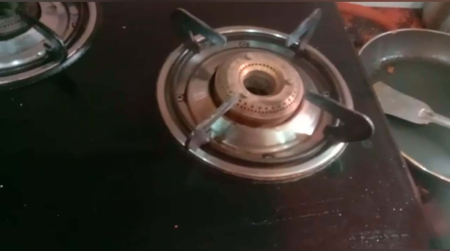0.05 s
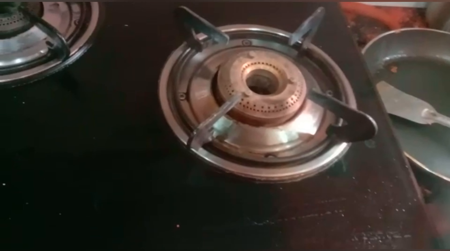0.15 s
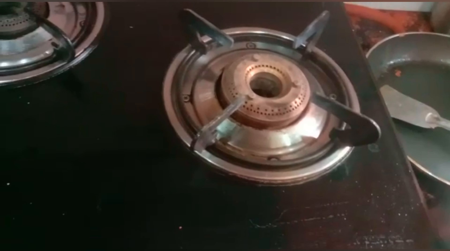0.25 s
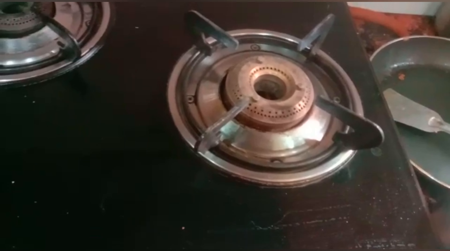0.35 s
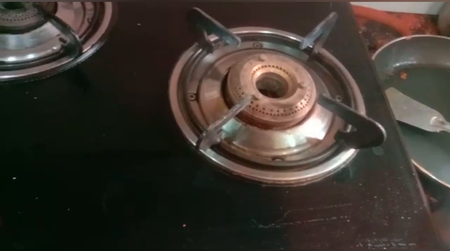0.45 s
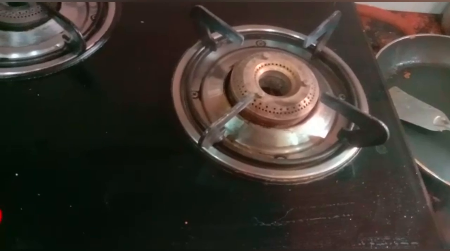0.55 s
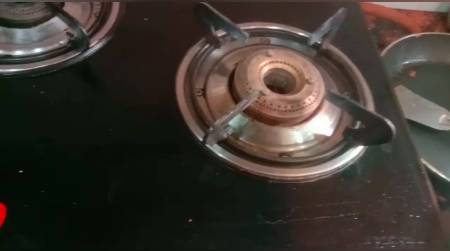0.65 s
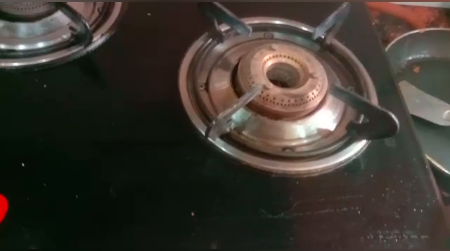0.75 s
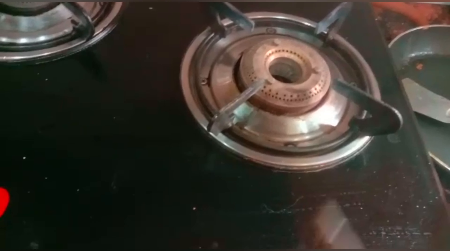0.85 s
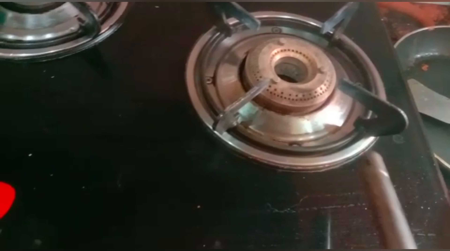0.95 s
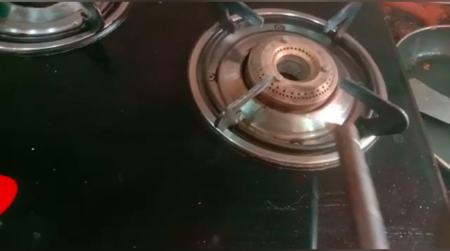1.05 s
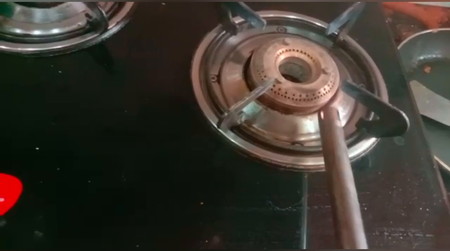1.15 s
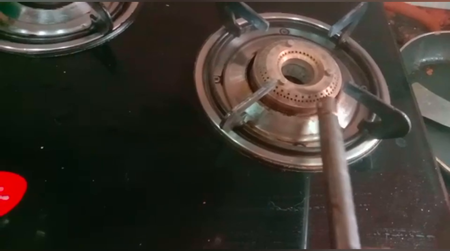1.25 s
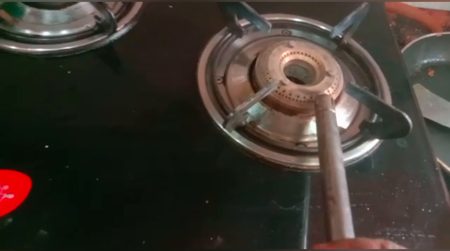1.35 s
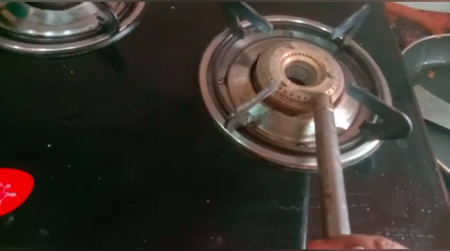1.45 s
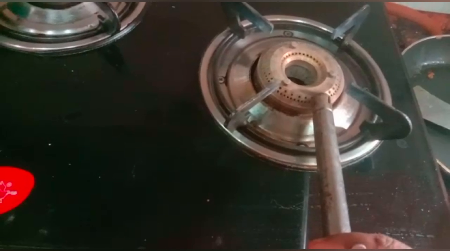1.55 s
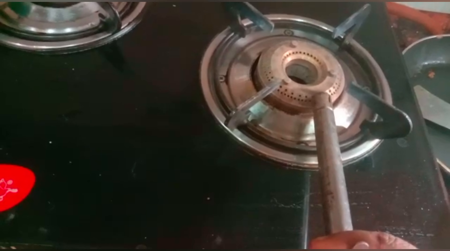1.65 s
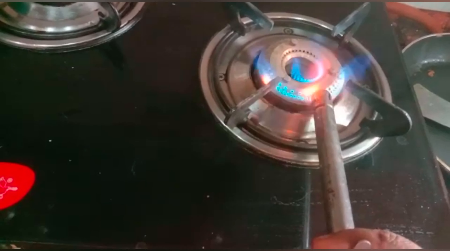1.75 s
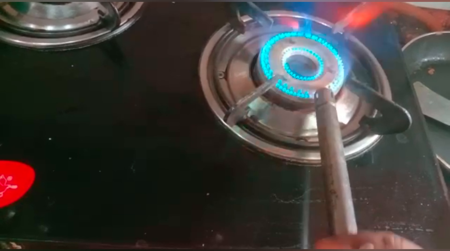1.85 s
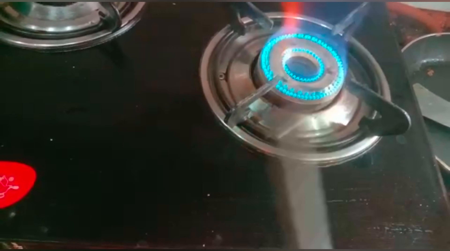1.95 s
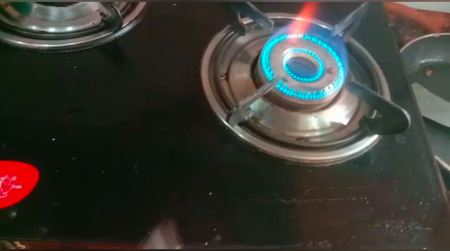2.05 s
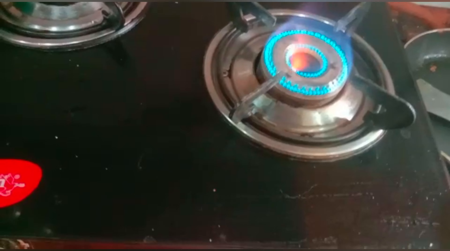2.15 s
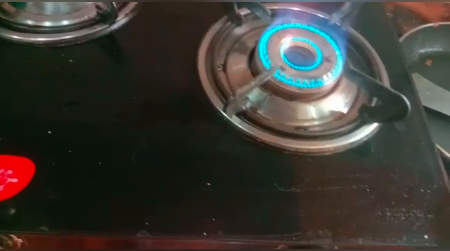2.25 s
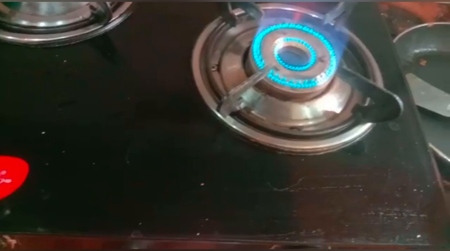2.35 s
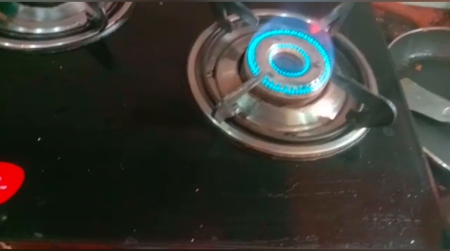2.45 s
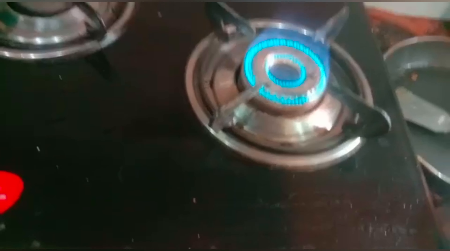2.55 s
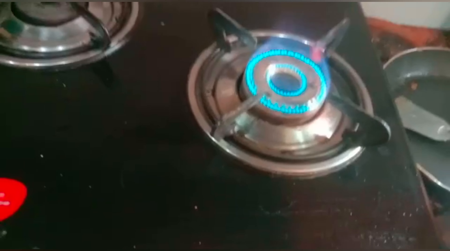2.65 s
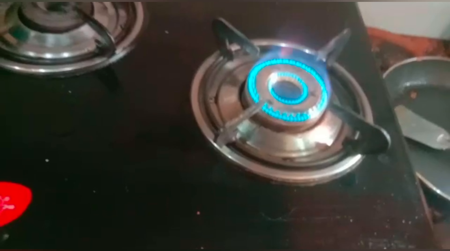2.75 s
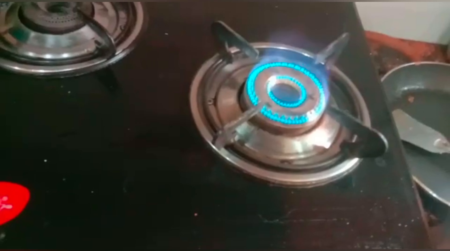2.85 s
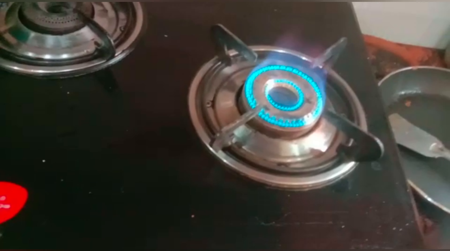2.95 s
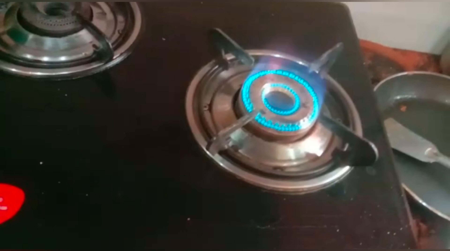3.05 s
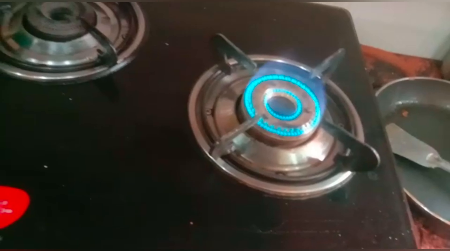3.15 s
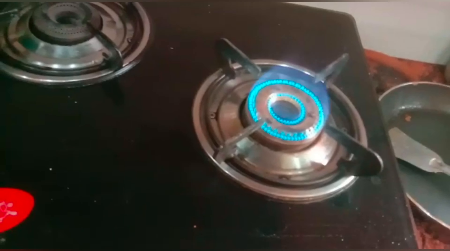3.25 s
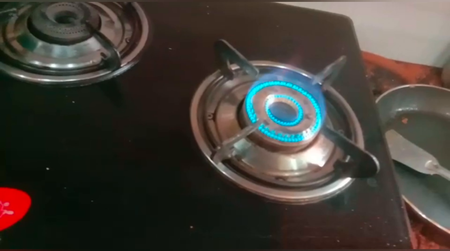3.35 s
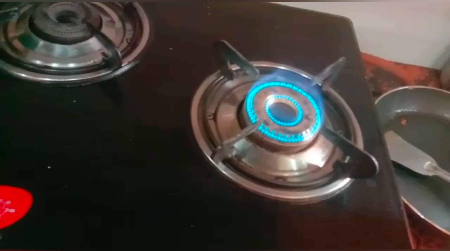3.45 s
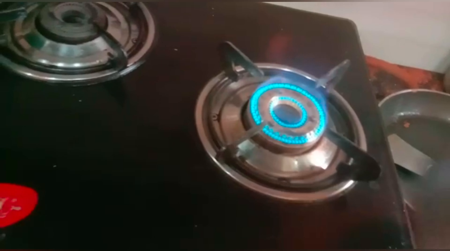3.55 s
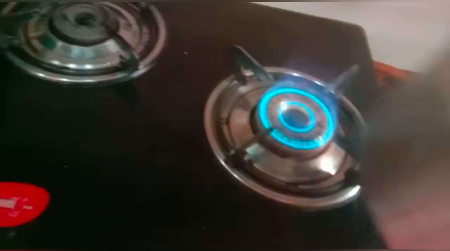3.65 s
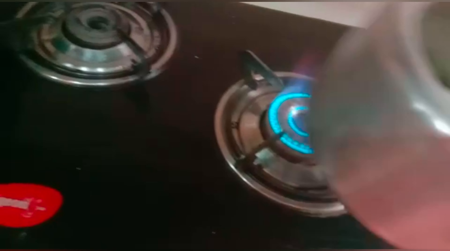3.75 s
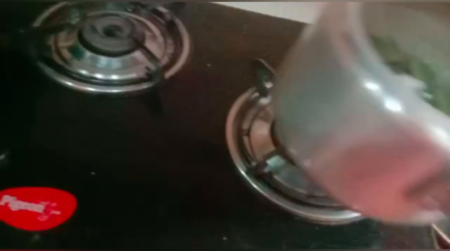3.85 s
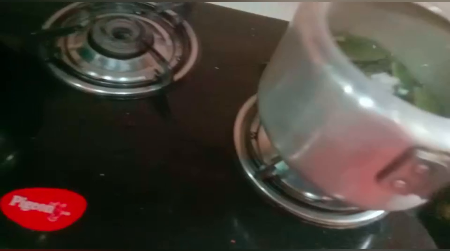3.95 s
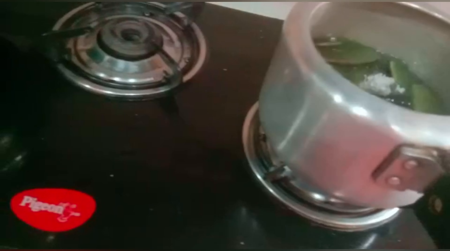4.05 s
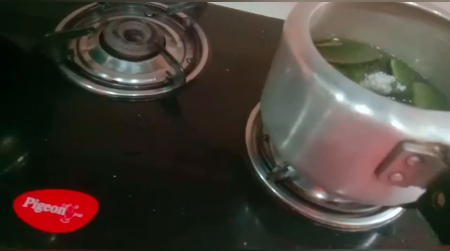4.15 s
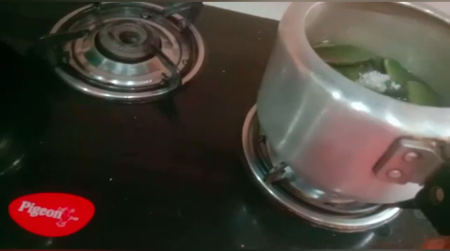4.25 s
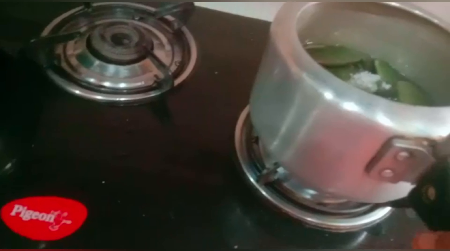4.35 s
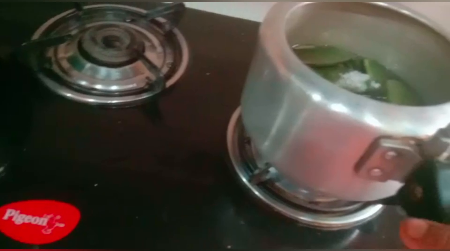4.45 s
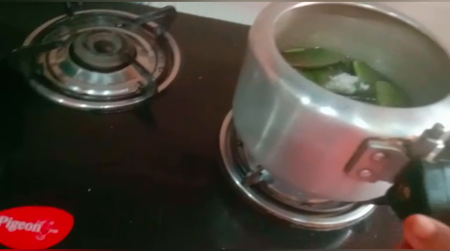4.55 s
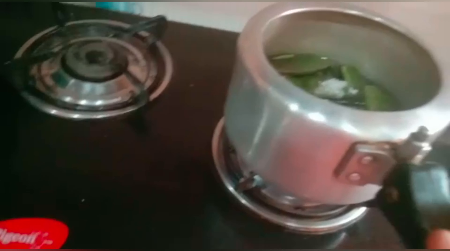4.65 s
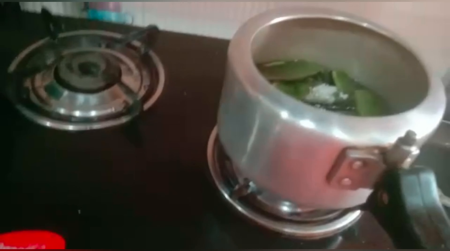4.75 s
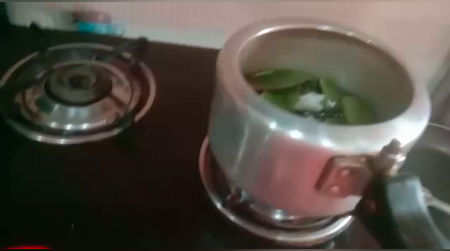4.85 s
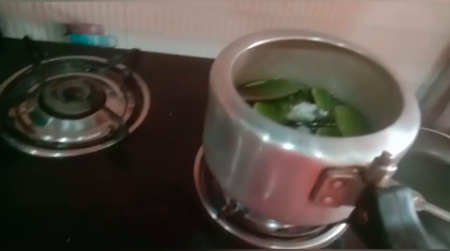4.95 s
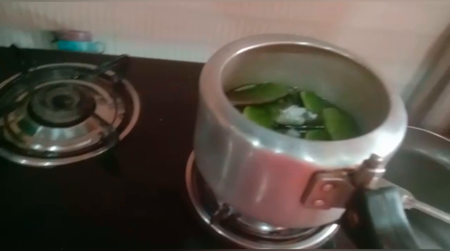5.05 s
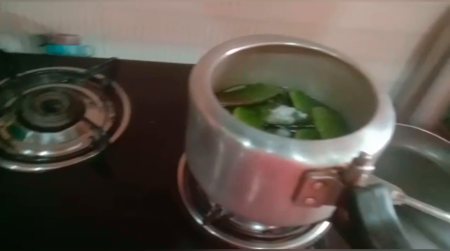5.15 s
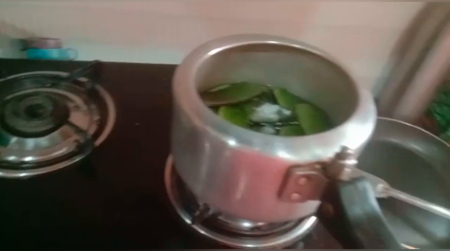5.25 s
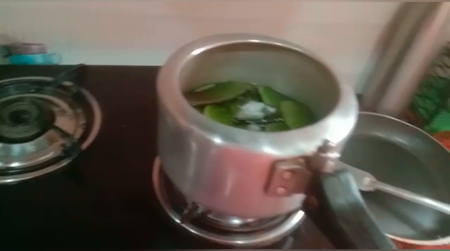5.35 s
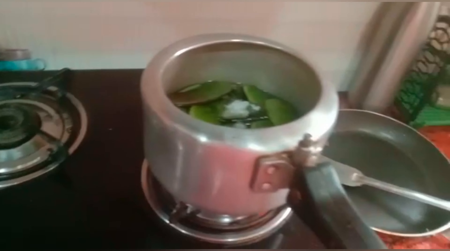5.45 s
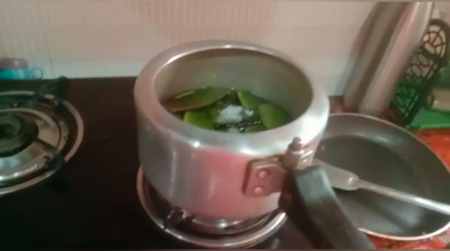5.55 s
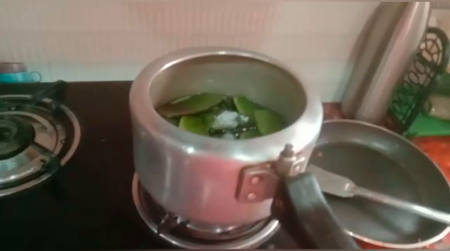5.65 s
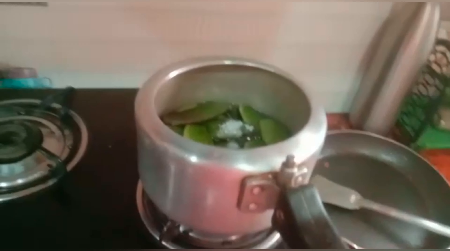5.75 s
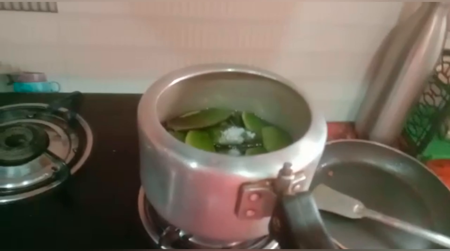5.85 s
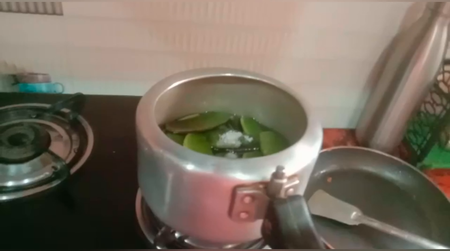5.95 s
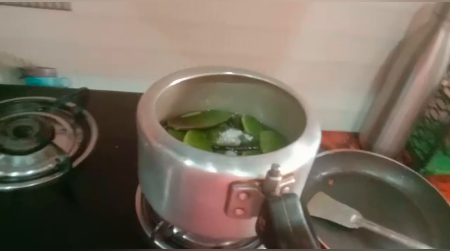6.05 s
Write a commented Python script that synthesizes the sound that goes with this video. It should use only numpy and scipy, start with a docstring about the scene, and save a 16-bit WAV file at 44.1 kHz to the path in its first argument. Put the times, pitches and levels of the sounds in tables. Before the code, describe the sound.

Sharp clicks and a soft whump of gas lighting in a small kitchen, followed by a lighter clattering down and a pot knocking into place.

```python
"""A steel spark lighter clicks at a glass-top stove; the gas ring catches with a low puff.
The lighter drops on the counter, then an aluminium pressure cooker is lifted and rocks on the pan support.
Each blow is a dying noise burst that rings the object's modes and echoes in a small hard kitchen.
Underneath: low rumble, faint rustle of hands and gas, metal squeaks and microphone hiss."""
import sys
import numpy as np
from scipy import signal
from scipy.io import wavfile

SR = 44100
rng = np.random.default_rng(int(sys.argv[2]) if len(sys.argv) > 2 else 0)


def store_wav(level_fs):
    """Save 16-bit WAV to argv[1]."""
    pcm = np.round(np.clip(np.atleast_2d(level_fs), -1, 1) * 32767)
    wavfile.write(sys.argv[1], SR, pcm.T.astype(np.int16))


N = 269010

# Background over time. Each row: time in seconds, rumble in dB, rustle in dB.
BACKGROUND_LEVELS = [(0, -52, -54.5), (.22, -63, -62.5), (.52, -64, -73), (.58, -51, -61),
                     (.76, -57, -68.5), (.9, -65.5, -82), (1.2, -71.5, -85), (1.75, -69, -84),
                     (2.27, -73, -78), (2.6, -64.5, -60.5), (2.85, -72, -83), (3.2, -55.5, -60.5),
                     (3.33, -66.5, -71), (3.4, -63.5, -61.5), (3.57, -63.5, -68), (3.65, -73.5, -72),
                     (4.0, -62.5, -72), (4.6, -57.5, -68), (4.9, -67.5, -80), (5.15, -58, -71),
                     (5.45, -59.5, -72.5), (5.7, -53.5, -66), (6.1, -53.5, -73)]
# Noise spectra. Each row: frequency in Hz, relative density in dB.
RUMBLE_SPECTRUM = [(40, -46), (68, -24.5), (90, 6), (125, 2.5), (200, -13.5), (325, -4.5), (450, -29),
                   (600, -47)]
RUSTLE_SPECTRUM = [(240, -22.5), (400, -2.5), (600, -6), (1300, -4), (2700, -15.5), (5300, -32),
                   (7500, -39), (11000, -39), (16000, -43)]
HISS_SPECTRUM = [(35, -36), (60, -7.5), (103, 0.5), (172, -24.5), (323, -17.5), (492, -15.5), (968, -19.5),
                 (1250, -24), (1470, -31), (3270, -32.5), (16000, -56)]
# Room resonances that colour the rustle. Each row: centre in Hz, width in Hz, gain in dB.
RUSTLE_RESONANCES = [(680.3, 24, 12), (1035, 140, 4.5), (1470, 27, 2.5), (2280, 48, 7), (2700, 60, 4.5),
                     (3100, 81, -1.5), (3543, 360, 7.5), (4270, 40, 2.5), (5340, 470, 12), (5570, 150, 4),
                     (7140, 170, 1), (10800, 330, 9)]
# Metal squeaks. Each row: start in seconds, length in seconds, centre in Hz, width in Hz, level in dB.
METAL_SQUEAKS = [(.04, 0.3, 430, 60, -55), (0.02, .75, 4000, 3000, -64), (0.521, .03, 9700, 500, -69),
                 (0.572, 0.035, 9900, 1200, -64), (1.16, 0.09, 4300, 200, -76), (1.19, .26, 3350, 40, -82),
                 (1.455, 0.027, 9500, 700, -79), (3.378, 0.24, 2100, 120, -66), (3.38, .2, 2800, 250, -67),
                 (3.38, .24, 4800, 3500, -66), (5.114, 0.17, 3380, 80, -74), (5.08, 0.17, 7000, 210, -80.5),
                 (5.24, 0.16, 1478, 30, -61)]

# Edges in Hz of the five bands of a blow; the lowest band is the thud.
BLOW_EDGES_HZ = [140, 400, 1600, 5000, 10000, 16500]
# Blows. Each row: start in seconds, level in dB, tilt in dB per band, thud level in dB,
# contact decay time in ms, pitch of the struck spot in Hz.
STOVE_BLOWS = [(0.234,-47.5,-10,-70,3.2,830), (0.312,-34.5,4,-52,10,3480), (0.353,-22,-1.5,-33,5.05,876),
               (0.556,-84,10,-44.5,117,232), (1.037,-65.5,-3,-86,3.6,1300), (1.187,-53,8,-61.5,4.6,12200),
               (1.567,-41.5,-5.5,-45,21,767), (1.781,-11,7,-31.5,2.67,3490), (1.80,-46,9,-63.5,80,5176),
               (1.94,-46,3,-54,22,5200), (2.533,-3.5,5,-27,1.54,3400), (2.539,-28.5,-9.5,-27,11.2,1250),
               (2.626,-26,0.5,-41,4,3510), (2.642,-32,-0.5,-34.5,2.6,2200), (3.758,-61.5,-4,-50.5,4.8,5530),
               (3.85,-58,-6.5,-59.5,8,1400), (3.933,-52,-14.5,-69.5,2.7,716), (4.027,-56,-11,-59,4,1125),
               (5.555,-45.5,7,-59,29.6,10900)]  # knob, spark lighter and fingers on the stove
LIGHTER_BLOWS = [(2.285, -19.5, 1, -23.5, 3.75, 912), (2.32, -21.5, 2.5, -36.5, 3.2, 930),
                 (2.353, -27, -1, -38.5, 4.5, 600)]  # lighter bouncing on the counter
COOKER_BLOWS = [(2.946,-40,7,-47,7.1,1100), (2.977,-24,-3.5,-26,14.6,800), (3.003,-29,-3,-23,4,260),
                (3.07,-35.5,-1.5,-38.5,7.8,340), (3.098,-43.5,1,-56,4.8,2400), (3.148,-44.5,3,-34,6.5,2700),
                (4.053,-24.5,-6,-32,16,600), (4.062,-22.5,4.5,-34.5,25,1050), (4.151,-28,-7.5,-47,18,900),
                (4.158,-21.5,-1.5,-29.5,8.5,1200), (4.268,-53.5,-17,-62,31,700), (4.312,-39,-6,-39.5,8,600),
                (4.324,-30,-5,-37,6.9,800), (4.534,-55,-7.5,-89,24,900)]  # cooker on counter and pan support
# Colour of each object: gain in dB for the four bands above the thud.
STOVE_BANDS_DB = [-2.5, 0.16, -1.5, -10]
LIGHTER_BANDS_DB = [5.5, 0.8, -10.5, -4]
COOKER_BANDS_DB = [5, 0.14, -10.5, -27.5]
# Modes of each object. Each row: frequency in Hz, gain in dB, T60 in seconds.
STOVE_MODES = [(760, -41, 0.035), (1307, -47, 0.024), (2734, -33.5, 0.0085), (3333, -32.5, 0.015),
               (5110, -40, 0.069), (6980, -45.5, .04), (10250, -34, 0.028)]
LIGHTER_MODES = [(362, -45, 0.14), (590, -46, 0.12), (870, -44.5, .08), (8230, -33, 0.085),
                 (8430, -37, .07), (8820, -34, 0.1), (8880, -30, 0.14)]
COOKER_MODES = [(190, -46, 0.032), (259.5, -44, 0.13), (344, -53, 0.09), (436, -47, 0.13),
                (600, -53, 0.067), (735, -47, 0.07), (804, -44.5, 0.034), (1055, -40, 0.018),
                (1250, -49.5, 0.076), (1990, -52.5, 0.11)]

# Echo decay. Each row: frequency in Hz, T60 in seconds.
KITCHEN_T60_S = [(100, 0.2), (260, 0.51), (700, 0.37), (1840, 0.38), (4850, .35), (12800, 0.22)]
# Echo colour. Each row: frequency in Hz, gain in dB.
KITCHEN_GAIN_DB = [(100, 6), (300, -7), (1000, -6), (3000, -6.5), (7000, -10), (15000, -7.5)]
# Resonances of the small microphone in its case. Each row: centre in Hz, width in Hz, gain in dB.
MIC_RESONANCES = [(89, 17, 4.5), (332, 26, 7.5), (410, 32, 0.5), (818, 97, 5), (1259.5, 100, 11.5),
                  (2150, 170, 2), (2800, 310, 2), (5300, 700, -0.5), (7200, 600, 1), (7923, 700, -8.5),
                  (10500, 920, 0), (13200, 1500, -9.5), (16000, 1800, 8)]

TIME_S = np.arange(N) / SR


def from_db(db):
    """Amplitude gain of a level in dB."""
    return 10 ** (np.asarray(db) / 20)


def unit_rms(x):
    """Scale to rms 1."""
    return x / np.sqrt(np.mean(x ** 2) + 1e-20)


def at_hz(table, hz):
    """Interpolate a table on a log frequency axis."""
    table_hz, values = np.transpose(table)
    return np.interp(np.log(hz), np.log(table_hz), values)


def bandpass(x, low_hz, high_hz):
    """Butterworth band-pass."""
    return signal.sosfilt(signal.butter(2, [low_hz, high_hz], "band", fs=SR, output="sos"), x)


def peak(x, hz, width_hz, db):
    """Peaking filter; negative dB cuts a dip."""
    gain, width = from_db(db / 2), np.pi * width_hz / SR
    middle = -2 * np.cos(2 * np.pi * hz / SR)
    numerator = [1 + width * gain, middle, 1 - width * gain]
    return signal.lfilter(numerator, [1 + width / gain, middle, 1 - width / gain], x)


def drift(rate_hz):
    """Random wander of rms 1: noise low-passed at rate_hz."""
    hop, warmup = 40, 2000
    pole = np.exp(-2 * np.pi * rate_hz * hop / SR)
    white = rng.standard_normal(N // hop + warmup + 2)
    slow = signal.lfilter([1], [1, -2 * pole, pole * pole], white)[warmup:]
    return np.interp(np.arange(N) / hop, np.arange(len(slow)), unit_rms(slow))


def flickering_noise(spectrum, flicker_db, rate_hz, tilt_db_per_octave=0):
    """Third-octave noise bands that flicker partly together; the tilt spans 1.5 octaves from 1500 Hz."""
    edges_hz = 40 * 2 ** np.arange(0, 8.8, 1 / 3)
    out, common = 0, drift(rate_hz)
    white = rng.standard_normal((2, N))
    for k, (low_hz, high_hz) in enumerate(zip(edges_hz, edges_hz[1:])):
        hz = np.sqrt(low_hz * high_hz)
        tilt_db = tilt_db_per_octave * np.clip(np.log2(hz / 1500), 0, 1.5)
        wander_db = flicker_db * (0.82 * common + drift(rate_hz))
        gain = from_db(at_hz(spectrum, hz) + wander_db + tilt_db)
        out += gain * bandpass(white[k % 2], low_hz, high_hz)
    widths_hz = 0.23 * edges_hz
    power = np.sum(from_db(at_hz(spectrum, edges_hz)) ** 2 * widths_hz) * 2 / SR
    return out / np.sqrt(power)


def wall_rumble(level_db):
    """Low, slowly wavering noise through the walls."""
    return from_db(level_db) * flickering_noise(RUMBLE_SPECTRUM, flicker_db=2.5, rate_hz=2.3)


def rustle(level_db):
    """Noise of hands and gas, coloured by room resonances; the treble level swings less."""
    tilt = 4 - 0.18 * (level_db + 65)
    noise = flickering_noise(RUSTLE_SPECTRUM, flicker_db=2.5, rate_hz=14, tilt_db_per_octave=tilt)
    out = from_db(level_db) * noise
    for hz, width_hz, db in RUSTLE_RESONANCES:
        out = peak(out, hz, width_hz, db)
    return out


def mic_hiss(level_db=-78.5):
    """Noise floor of the microphone."""
    return from_db(level_db) * flickering_noise(HISS_SPECTRUM, flicker_db=1.5, rate_hz=12)


def squeaks():
    """Squeaks, hums and rubs of nearby metal: noise bands that swell and fade."""
    out = np.zeros(N)
    for start_s, length_s, hz, width_hz, db in METAL_SQUEAKS:
        start, length = round(start_s * SR), round(length_s * SR)
        noise = bandpass(rng.standard_normal(SR), hz - width_hz / 2, hz + width_hz / 2)
        settled = unit_rms(noise[SR // 5:])
        out[start:start + length] += from_db(db) * settled[:length] * np.sqrt(np.hanning(length))
    return out


def ring(x, hz, t60_s):
    """One mode: a unit click rings as a decaying sine of height 1."""
    pole, angle = from_db(-60 / (t60_s * SR)), 2 * np.pi * hz / SR
    return signal.lfilter([0, np.sin(angle)], [1, -2 * pole * np.cos(angle), pole * pole], x + 1e-18)


def blows(events, colour_db, modes, length=12000, rise_s=0.00018):
    """Contacts ring an object's modes. Two rows: direct rattle, equal-energy clicks to feed the room."""
    out, t = np.zeros((2, N + length)), np.arange(length) / SR
    onset = 1 - np.exp(-t / rise_s)
    end_fade = np.clip((t[-1] - t) / 0.1, 0, 1)
    for start_s, level_db, tilt_db, thud_db, contact_ms, spot_hz in events:
        start = round(start_s * SR)
        upper_db = level_db + np.array(colour_db) + tilt_db * np.arange(-1, 3)
        envelope = np.exp(-t * 1000 / np.clip(contact_ms, 0.3, 90)) * onset * end_fade
        rattle, click = rng.standard_normal(length) * envelope, t == 0
        contact = peak(np.array([rattle, click]), spot_hz, width_hz=0.3 * spot_hz, db=11)
        for k, db in enumerate([thud_db, *upper_db]):
            # Alternating signs make neighbouring bands add where they cross.
            part = bandpass(contact, *BLOW_EDGES_HZ[k:k + 2]) * (-1) ** k
            part *= 0.5 * np.linalg.norm(envelope) / np.linalg.norm(part, axis=1, keepdims=True)
            out[:, start:start + length] += from_db(db) * part
    contacts = out[:, :N]
    return contacts + sum(from_db(db) * ring(contacts, hz, t60_s) for hz, db, t60_s in modes)


def kitchen_echoes(x, first_wall_s=0.003, build_s=0.004, crossfade_s=0.95):
    """Dense echoes as decaying noise; two patterns crossfade, so the colour varies between blows."""
    t, edges_hz = np.arange(SR) / SR, 60 * 2 ** np.arange(0, 8.6, 0.5)
    white, tails = rng.standard_normal((2, 2, SR)), 0
    for k, (low_hz, high_hz) in enumerate(zip(edges_hz, edges_hz[1:])):
        hz = np.sqrt(low_hz * high_hz)
        decay_db = at_hz(KITCHEN_GAIN_DB, hz) - 60 * t / at_hz(KITCHEN_T60_S, hz)
        tails += bandpass(white[k % 2], low_hz, high_hz) * from_db(decay_db)
    tails *= from_db(drift(rate_hz=130)[:SR])  # loose parts and near walls make the tail lumpy
    tails *= np.clip((t - first_wall_s) / build_s, 0, 1) / np.sqrt(SR / 100)
    angle = np.pi / 2 * TIME_S / crossfade_s
    feeds = x * [np.cos(angle), np.sin(angle)]
    return signal.fftconvolve(feeds, tails, axes=1)[:, :N].sum(axis=0)


def flame_puff(start_s=1.772, end_s=2.03, rise_s=0.012, level_db=-35.5, fade_db_per_s=95.5):
    """The gas catches: a low, fluttering puff that rises fast and fades."""
    t = TIME_S - start_s
    window = np.clip(t / rise_s, 0, 1) * np.clip((end_s - TIME_S) / 0.03, 0, 1)
    flutter = unit_rms(bandpass(rng.standard_normal(N), low_hz=75, high_hz=180))
    return window * from_db(level_db - fade_db_per_s * np.abs(t)) * flutter


def suppressor(x, margin_db=37.5, depth_db=8, forget_db_per_s=42):
    """Turns tails down once they fall far below the last loud moment."""
    power = signal.lfilter([0.002], [1, -0.998], x ** 2)
    level_db = 10 * np.log10(power + 1e-12)
    fall_db = forget_db_per_s * TIME_S
    held_db = np.maximum.accumulate(level_db + fall_db, axis=-1) - fall_db
    return x * from_db(-np.clip(held_db - level_db - margin_db, 0, depth_db))


def scene():
    """Mono mix of blows, echoes, squeaks, flame and background."""
    stove = blows(STOVE_BLOWS, STOVE_BANDS_DB, STOVE_MODES)
    lighter = blows(LIGHTER_BLOWS, LIGHTER_BANDS_DB, LIGHTER_MODES)
    cooker = blows(COOKER_BLOWS, COOKER_BANDS_DB, COOKER_MODES)
    direct, room_feed = stove + lighter + cooker
    mix = direct + kitchen_echoes(room_feed) + squeaks() + flame_puff()
    times_s, rumble_db, rustle_db = np.transpose(BACKGROUND_LEVELS)
    mix += wall_rumble(np.interp(TIME_S, times_s, rumble_db))
    mix += rustle(np.interp(TIME_S, times_s, rustle_db))
    return (mix + mic_hiss())[None]


def record(dry, bass_cut_hz=68, ceiling=0.9, shelf_hz=15900, cutoff_hz=17350):
    """Bass cut, microphone resonances, suppressor, soft clip, a step down at the top, a steep cut."""
    x = signal.sosfilt(signal.butter(4, bass_cut_hz, "high", fs=SR, output="sos"), dry)
    for hz, width_hz, db in MIC_RESONANCES:
        x = peak(x, hz, width_hz, db)
    x = ceiling * np.tanh(suppressor(x) / ceiling)
    dull = signal.sosfilt(signal.cheby2(12, 50, shelf_hz, fs=SR, output="sos"), x)
    shelved = dull + from_db(-26) * x
    return signal.sosfilt(signal.cheby2(20, 70, cutoff_hz, fs=SR, output="sos"), shelved)


dry = scene()
out = record(dry)
store_wav(out)
```